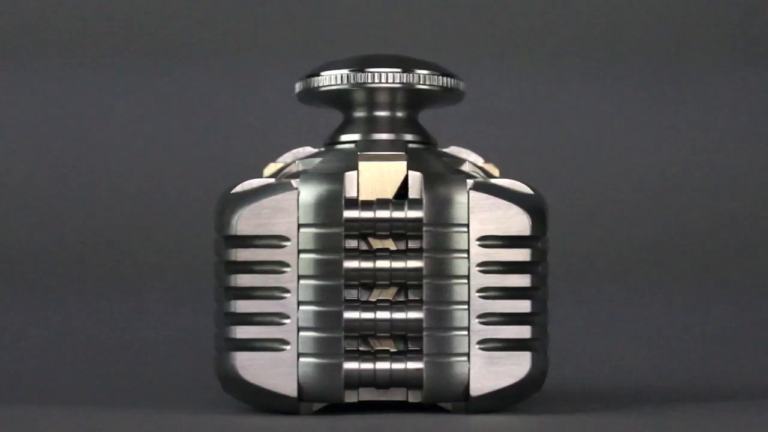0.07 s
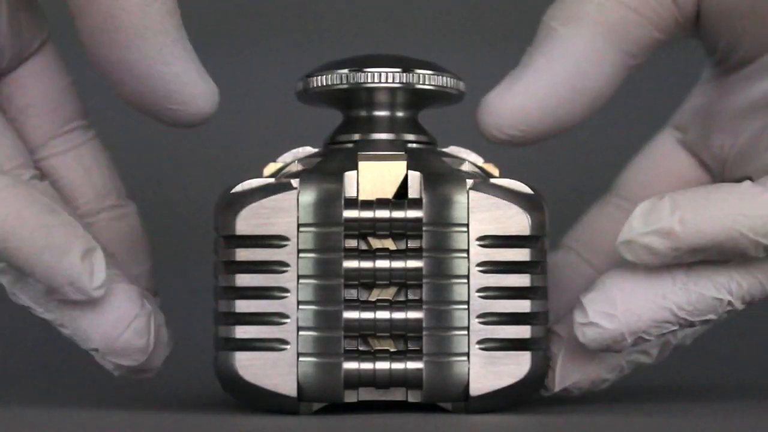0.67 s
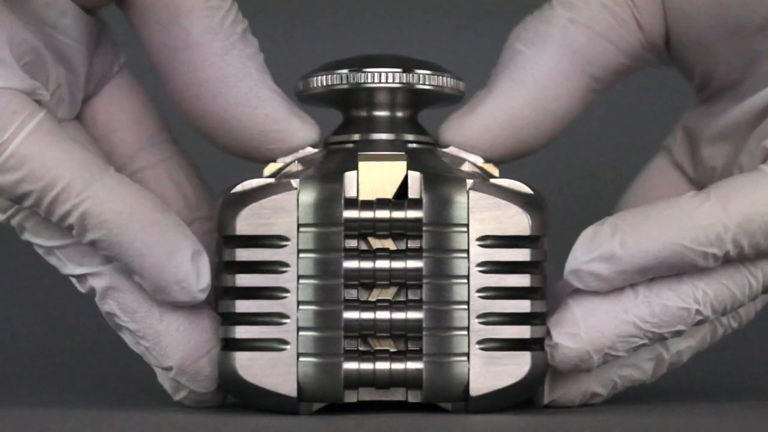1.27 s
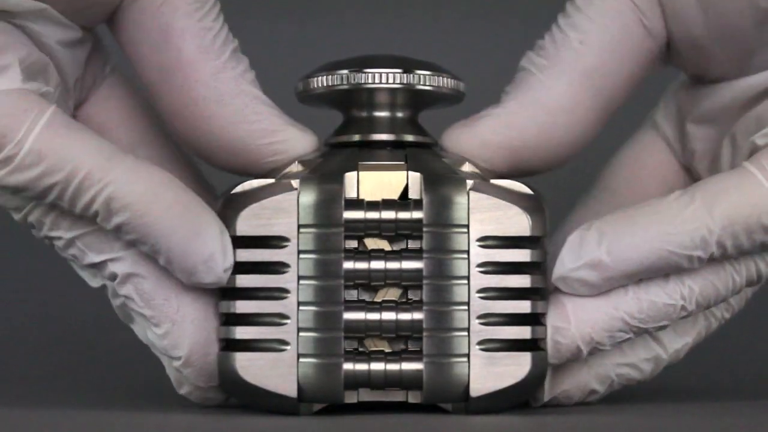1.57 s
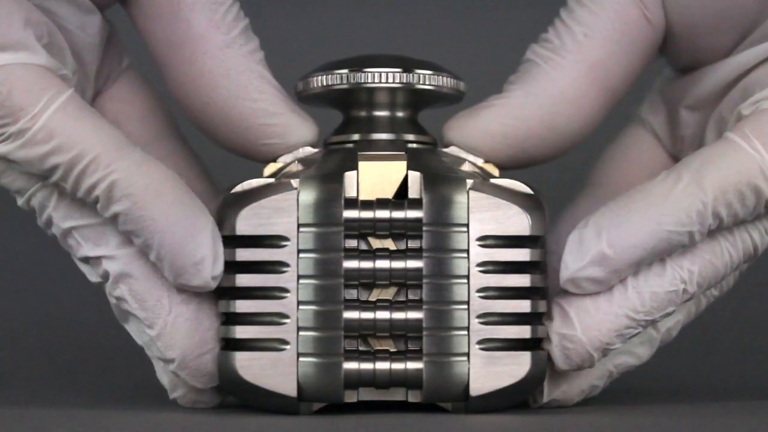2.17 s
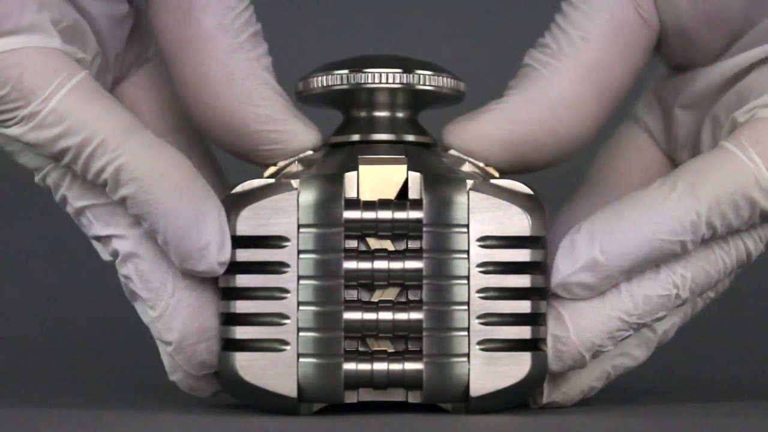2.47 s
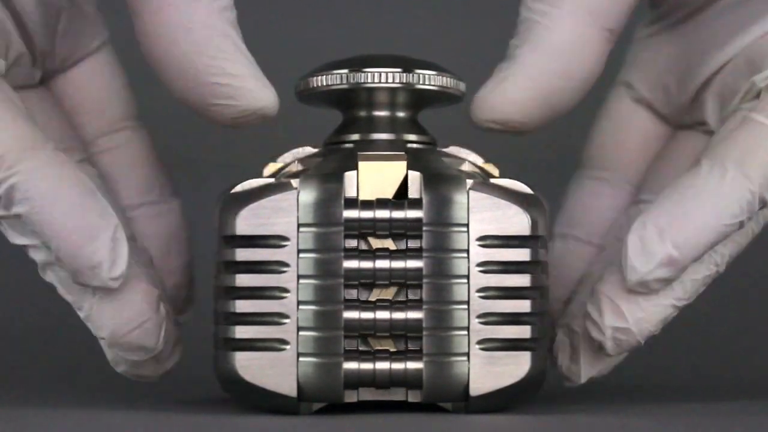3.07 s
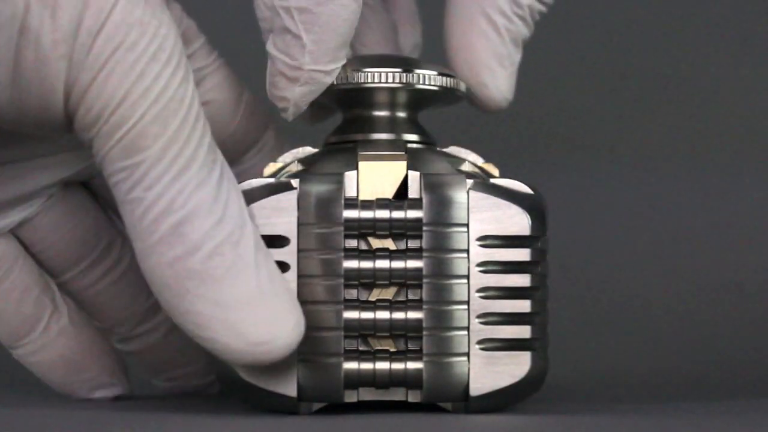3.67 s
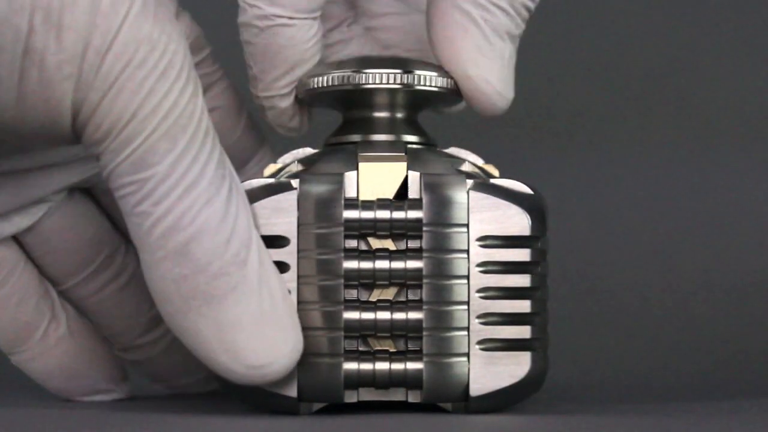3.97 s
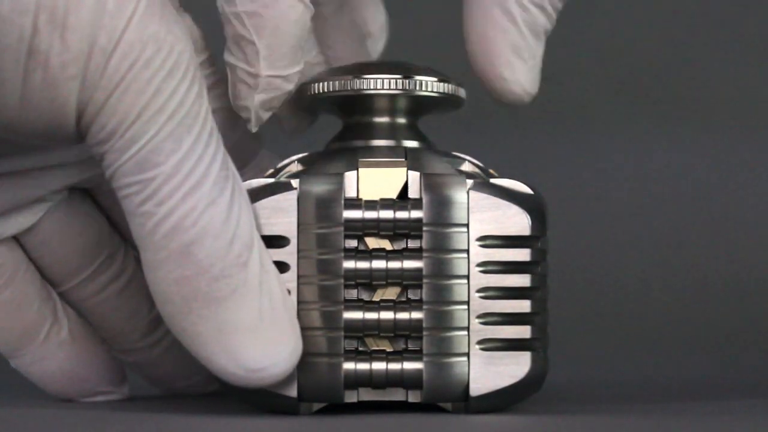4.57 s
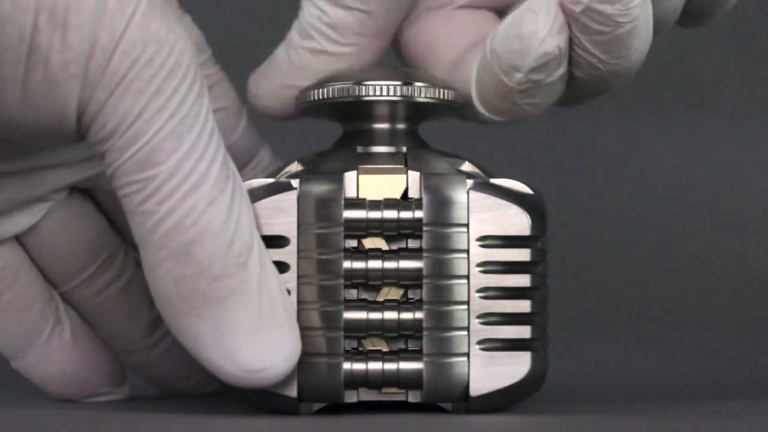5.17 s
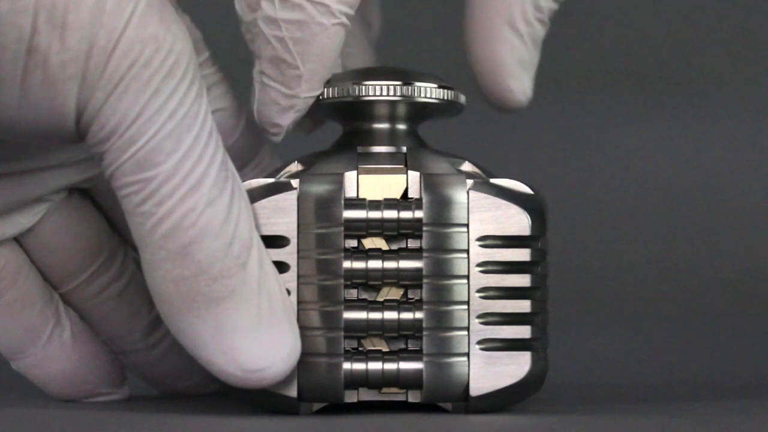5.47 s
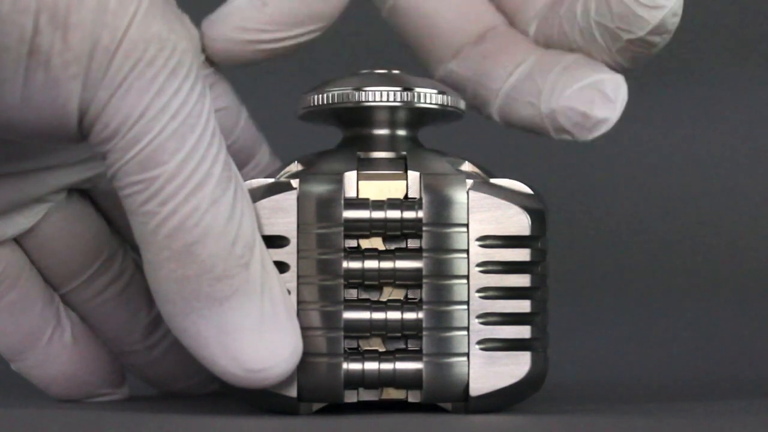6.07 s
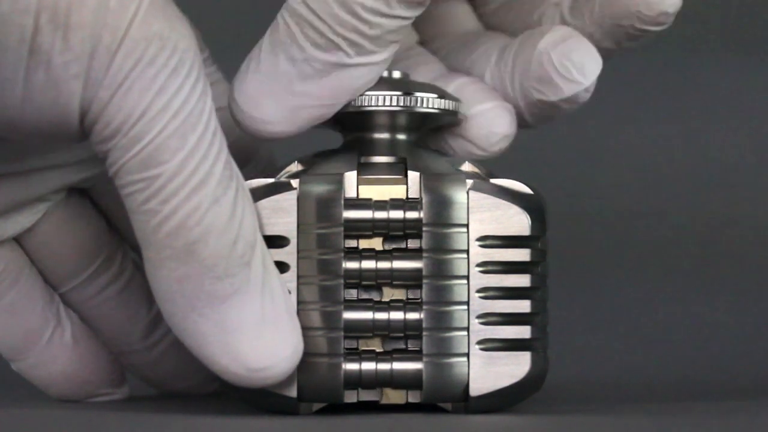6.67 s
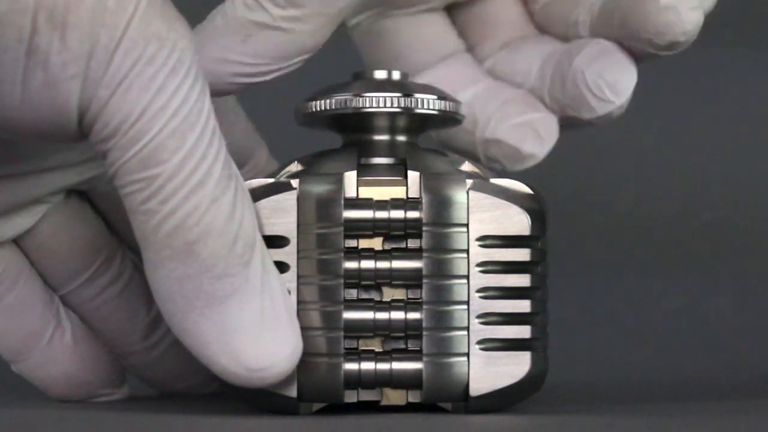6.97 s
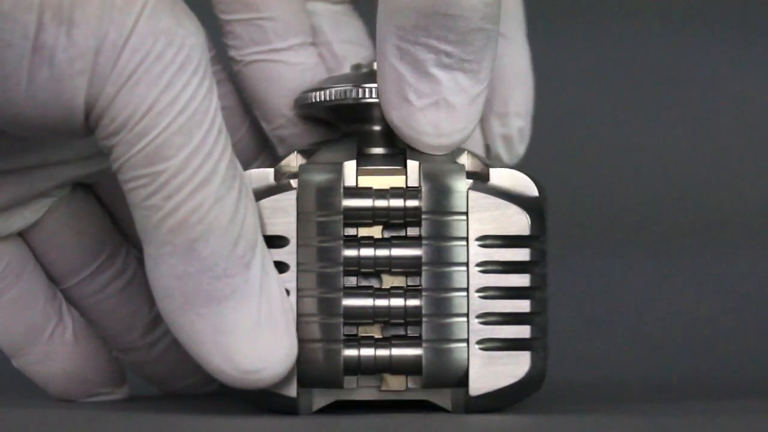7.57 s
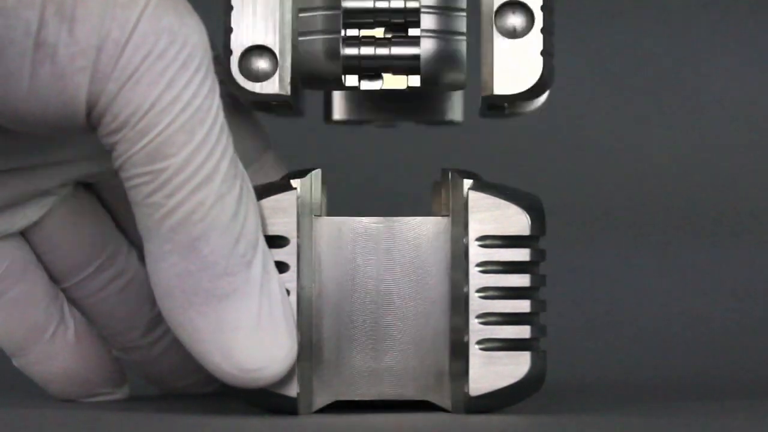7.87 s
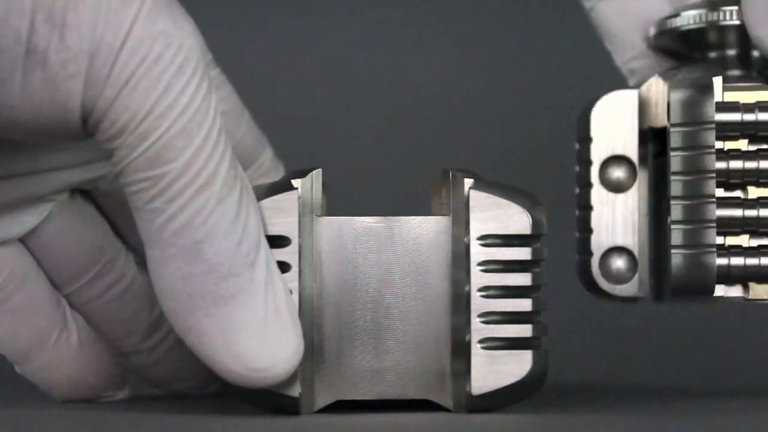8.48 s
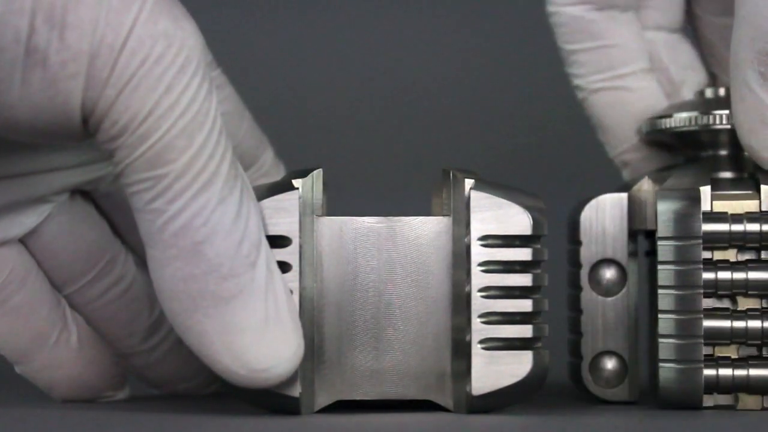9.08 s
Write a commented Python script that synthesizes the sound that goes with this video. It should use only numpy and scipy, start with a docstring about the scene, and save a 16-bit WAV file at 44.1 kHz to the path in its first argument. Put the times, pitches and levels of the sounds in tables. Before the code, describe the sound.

Rubber gloves brush a table and rub on a small steel lock. Loose parts knock and springs ping, then two buttons snap in sharply, a second apart. A knob grinds through four short turns, with glove crinkles and little rubber snaps. The core scrapes up out of its housing with a brief metallic ring and is set on the table with a clunk. The sound is close, in a quiet, slightly live room.

```python
"""Opening a steel puzzle lock

Gloved hands work a small lock on a table in a quiet, slightly live room. Rubber rubs, loose
parts knock and ping, and two sprung buttons slide and snap in. A knurled knob grinds through
four turns, then the core scrapes up between its steel cheeks and is set down with a clunk."""
import sys
import numpy as np
from scipy import signal
from scipy.fft import rfft, irfft
from scipy.io import wavfile

SR = 44100
rng = np.random.default_rng(int(sys.argv[2]) if len(sys.argv) > 2 else 0)


def waveform_to_disk(signal):
    """Save audio, clipped to [-1, 1], as 16-bit WAV at the path in sys.argv[1]."""
    frames = np.transpose(np.atleast_2d(signal))
    scaled = np.clip(frames, -1, 1) * 32767
    samples = np.round(scaled).astype(np.int16)
    wavfile.write(sys.argv[1], SR, samples)


N = 410571


def from_db(db):
    """Decibels to gain."""
    return 10 ** (np.asarray(db) / 20)


def in_time(points):
    """A curve of (time, value) points, read at every sample."""
    return np.interp(np.arange(N) / SR, *np.transpose(points))


def at_hz(points, hz):
    """A curve of (frequency, value) points, read on a log-frequency axis."""
    f, value = np.transpose(points)
    return np.interp(np.log(np.maximum(hz, 1)), np.log(f), value)


def through(x, response):
    """Pass a sound through an impulse response."""
    return signal.oaconvolve(x, response)[:len(x)]


def colour(spectrum, size=4096):
    """Minimum-phase response of unit energy with the given spectral shape."""
    hz = np.arange(size // 2 + 1) * SR / size
    cepstrum = irfft(np.log(from_db(at_hz(spectrum, hz))))
    cepstrum[1:size // 2] *= 2
    cepstrum[size // 2 + 1:] = 0
    response = irfft(np.exp(rfft(cepstrum)))
    return response / np.linalg.norm(response)


def body(modes):
    """Unit-energy response of damped resonances (f/Hz, width/Hz, level/dB)."""
    t = np.arange(SR // 2) / SR
    response = 0
    for k, (hz, width, db) in enumerate(modes):
        decay = from_db(db) * width * np.exp(-np.pi * width * t)
        response += (-1) ** k * decay * np.sin(2 * np.pi * hz * t)
    return response / np.linalg.norm(response)


def strike(hits, modes):
    """Clean blows (t/s, peak/dB) on a body."""
    force, response = np.zeros(N), body(modes)
    for s, db in hits:
        force[int(s * SR)] += from_db(db)
    return through(force, response / np.abs(response).max())


def chatter(hits, t60):
    """Each hard contact (t/s, level/dB) is a burst of tiny collisions that dies within milliseconds."""
    out, t = np.zeros(N), np.arange(SR // 10) / SR
    for s, db in hits:
        at = int(s * SR)
        burst = from_db(db - 60 * t / t60) * rng.standard_normal(len(t))
        out[at:at + len(t)] += burst[:N - at]
    return out


def friction(per_s, spread_db, judder_db, judder_per_s):
    """Asperities slip with uneven force, in clumps as the surfaces stick and let go; unit power."""
    slips = (rng.random(N) < per_s / SR) * rng.choice([-1, 1], N)
    sizes = from_db(spread_db * np.minimum(rng.exponential(1, N), 4))
    judder = np.interp(np.arange(N) * judder_per_s / SR, np.arange(N), rng.standard_normal(N))
    force = slips * sizes * from_db(judder_db * judder)
    return force / np.sqrt(np.mean(force ** 2) + 1e-20)


def swell(s, db, rise_s, fall_s, hold_s=0):
    """Envelope of a move that peaks at s and may hold; rise and fall are times per 20 dB."""
    t = np.arange(N) / SR
    away = np.maximum((s - t) / rise_s, (t - s - hold_s) / fall_s)
    return from_db(db - 20 * np.clip(away, 0, 6))


def swells(rows):
    """Envelope of several such moves."""
    return sum(swell(*row) for row in rows)


def gliding_resonance(x, hz, width_hz):
    """A resonance whose centre moves; white noise keeps its power."""
    carrier = np.exp(2j * np.pi * np.cumsum(hz) / SR)
    pole = np.exp(-np.pi * width_hz / SR)
    ringing = carrier * signal.lfilter([1], [1, -pole], x / carrier + 1e-18)
    return np.sqrt(2 * (1 - pole * pole)) * ringing.imag


# EQ of the room's rumble and of soft hiss: f/Hz, level/dB
RUMBLE_EQ = [(15, -50), (25, -12.5), (53, -10.5), (113, -0.5), (198, -10), (233, -2.5), (260, -9.5),
             (349, -6.5), (399, -13.5), (445, -6.5), (552, -16), (826, -16), (1170, -21.5), (8350, -34),
             (15500, -46)]
HISS_EQ = [(200, -23), (700, -1), (2500, -5.5), (6000, -11), (10000, -17.5), (16000, -35)]

def room_tone():
    """A steady bed of low rumble, a soft hum near its peak, and hiss."""
    noise = rng.standard_normal((3, N))
    rumble = from_db(-49.5) * through(noise[0], colour(RUMBLE_EQ))
    hum = from_db(-58.5) * through(noise[1], body([(116.8, 3.6, 0)]))
    hiss = from_db(-60.5) * through(noise[2], colour(HISS_EQ))
    return rumble + hum + hiss


# hand moves: t/s, level/dB, rise/s, fall/s
HAND_SWISHES = [(.18, -56, 0.14, 0.082), (.32, -51.5, 0.47, 0.97), (3.35, -54, 1, 2.6)]  # reaching in and changing grip
TABLE_BRUSHES = [(.31, -53, 0.13, 0.35), (.605, -50, 0.14, 0.052)]  # sweeping over the table
STEEL_RUBS = [(.882, -46.5, 0.095, 0.029), (1.2, -61, .1, .1), (1.56, -54, 0.15, 0.35),
              (2.58, -53, .1, .15), (3.25, -58.5, 0.22, .45), (4.1, -56, .05, 0.062),
              (4.254, -39.5, .025, 0.034), (4.53, -53, 0.12, 0.15), (4.624, -50.5, .03, 0.11),
              (5.072, -49, 0.018, 0.046), (5.455, -51, 0.2, 0.081), (6.25, -54, 0.32, 0.19),
              (6.714, -51, 0.01, 0.041), (6.843, -46.5, 0.024, .03), (7.082, -46, 0.069, 0.031),
              (7.186, -59, 0.22, .25)]  # taking hold of the steel or letting go
# rubber snapping off metal: t/s, level/dB
GLOVE_SNAPS = [(0.9448, -40), (3.6122, -31), (4.1774, -30), (4.5227, -34), (5.2734, -35), (6.2492, -29.5),
               (6.3684, -32.5), (6.7354, -23), (7.191, -34)]
# EQ of the dull table brush and of bright rubber on steel: f/Hz, level/dB
BRUSH_EQ = [(100, -5), (450, -1.5), (1000, -4.5), (1500, -15), (3000, -14), (12000, -34)]
RUBBER_EQ = [(300, -27), (1500, 1.5), (4000, -0.5), (7500, 2.5), (11000, -2.5), (13500, -9.5), (16000, -28)]

def gloves():
    """Thin rubber brushes the table, hisses and crinkles over the knurling and at times snaps free."""
    slips = friction(6000, spread_db=4, judder_db=2.5, judder_per_s=170)
    crinkles = from_db(-10) * friction(70, spread_db=7.5, judder_db=6.5, judder_per_s=20)
    # the fingers rub loudest where each turn of the knob is fastest
    turning = sum(swell(fastest_s, db, rise_s=0.2, fall_s=0.15) for _, _, fastest_s, *_, db in TURNS)
    rubbing = (swells(STEEL_RUBS) + turning) * (slips + crinkles)
    snapping = from_db(-8) * chatter(GLOVE_SNAPS, t60=0.0063)
    swishing = swells(HAND_SWISHES) * through(rng.standard_normal(N), colour(HISS_EQ))
    brushing = through(swells(TABLE_BRUSHES) * slips, colour(BRUSH_EQ))
    return through(rubbing + snapping, colour(RUBBER_EQ)) + brushing + from_db(-1.5) * swishing


# dull knocks inside the housing: t/s, level/dB, f/Hz
KNOCKS = [(0.319, -41.5, 930), (1.038, -43, 750), (1.334, -44, 200), (1.635, -37.5, 1063),
          (2.600, -27.5, 982), (4.078, -40, 990), (4.202, -28.5, 850), (5.016, -29, 870), (5.101, -33, 580),
          (5.768, -38.5, 1045), (5.848, -30, 940), (5.990, -28, 555), (6.883, -26.5, 579),
          (7.700, -17.5, 1274), (7.934, -26, 321)]
# pings of the button springs: t/s, level/dB
SPRING_PINGS = [(1.660, -43), (1.692, -42), (1.760, -35.5), (1.844, -46), (2.620, -47), (2.643, -55),
                (2.6735, -37)]
# single steel parts ringing briefly: t/s, level/dB, f/Hz, width/Hz
STEEL_TINGS = [(1.760, -40, 2290, 18), (2.5762, -38, 5200, 500), (2.643, -43, 7900, 150),
               (2.969, -45, 4370, 25), (3.2418, -26, 5560, 1200), (5.783, -32, 4800, 270),
               (5.829, -37, 3120, 120), (5.853, -33, 4960, 59), (6.712, -26.5, 4950, 60.7),
               (7.701, -24, 2380, 110), (7.933, -27, 1940, 130)]
# ring of the housing and of the springs: f/Hz, width/Hz, level/dB
HOUSING_MODES = [(305, 48, -8), (460, 98, -3.5), (569, 67, -5.5), (656, 67, -2.5), (838, 91, -2),
                 (1031, 114, 0.5), (1129, 44, 2), (1400, 110, -12), (1910, 180, -8)]
SPRING_MODES = [(2216, 26, -4), (2680, 44, -9), (3275, 66, -5), (3530, 7, 2), (4380, 28, -2.5),
                (5478, 15, -9), (7050, 20, -9.5), (7460, 36, -17)]
# EQ of a hard steel crack: f/Hz, level/dB
CRACK_EQ = [(150, -27), (600, -1), (2100, 3), (3600, -3), (6500, -1.5), (9000, -13), (10500, -27),
            (13700, -27), (16000, -8)]

def loose_parts(knock_width_hz=40):
    """Parts knock, and springs tick and ping, as the load on them changes."""
    knocks = from_db(1) * sum(strike([(s, db)], [(hz, knock_width_hz, 0)]) for s, db, hz in KNOCKS)
    housing = from_db(0.5) * strike([(s, db) for s, db, _ in KNOCKS], HOUSING_MODES)
    pings = from_db(5) * strike(SPRING_PINGS, SPRING_MODES)
    ticks = from_db(-4) * through(chatter(SPRING_PINGS, t60=0.035), colour(CRACK_EQ))
    tings = sum(strike([(s, db)], [(hz, width, 0)]) for s, db, hz, width in STEEL_TINGS)
    return knocks + housing + pings + ticks + tings


# buttons taking up their slack: t/s, length/s, level/dB
TAKE_UPS = [(1.542, 0.084, -45), (2.56, 0.055, -44)]
# a button trips its catch, then snaps home:
# trip t/s, crack level/dB, ring f/Hz, ring level/dB, home t/s, level/dB, housing level/dB, clack f/Hz
PRESSES = [(2.0051, -27.5, 6850, -20.5, 2.0614, -19.5, -21, 1090),
           (2.9662, -33, 3950, -29.5, 3.0374, -16.5, -16, 2080)]
# EQ of a button sliding in its guide: f/Hz, level/dB
SLIDE_EQ = [(100, 2), (450, -4.5), (1050, 1), (2000, -7.5), (3500, -8), (6000, -14), (9000, -22),
            (11000, -36), (16000, -63)]

def button_slides(glide_db=-49, rush_db=-11):
    """The buttons rub in their guides: they take up slack, glide once the catch trips, and rush home."""
    t = np.arange(N) / SR
    travel = sum(swell(s, db, rise_s=0.062, fall_s=0.15, hold_s=length) for s, length, db in TAKE_UPS)
    for trip_s, *_, home_s, _, knock_db, _ in PRESSES:
        travel += from_db(glide_db) * (t > trip_s) * (t < home_s)
        travel += swell(home_s, knock_db + rush_db, rise_s=0.025, fall_s=0.02)
    slips = friction(5000, spread_db=4, judder_db=2, judder_per_s=160)
    return travel * through(slips, colour(SLIDE_EQ))


# the four contacts in each snap home, with times and levels relative to it:
# t/s, crack level/dB, ring f/Hz, ring level/dB, housing level/dB
SNAP_CONTACTS = [(-.0028, -12, 8800, -11, -20), (0, -4.5, 8750, -3.5, -9.5), (.0045, -.5, 7670, 0, -6),
                 (.0084, -5.5, 6500, -9, -4)]

def button_snaps(ring_width_hz=700, creep_s=0.0026, creep_db=-31, trip_knock_db=-32, clack_db=-1):
    """Each trip and snap home is a crack, a short ring of the catch and a knock in the housing."""
    cracks, rings, knocks = [], [], []
    for trip_s, trip_db, trip_hz, trip_ring_db, home_s, home_db, knock_db, clack_hz in PRESSES:
        cracks.append((trip_s - creep_s, creep_db))  # the catch ticks just before it trips
        cracks.append((trip_s, trip_db))
        rings.append((trip_s, trip_ring_db, trip_hz))
        knocks.append((trip_s, trip_knock_db))
        last_contact_s = home_s + SNAP_CONTACTS[-1][0]
        rings.append((last_contact_s, home_db + clack_db, clack_hz))  # the button's own note
        for delay, crack_db, hz, ring_db, housing_db in SNAP_CONTACTS:
            cracks.append((home_s + delay, home_db + crack_db))
            rings.append((home_s + delay, home_db + ring_db, hz))
            knocks.append((home_s + delay, knock_db + housing_db))
    cracking = through(chatter(cracks, t60=0.018), colour(CRACK_EQ))
    ringing = sum(through(chatter([(s, db)], t60=0.015), body([(hz, ring_width_hz, 0)]))
                  for s, db, hz in rings)
    return cracking + ringing + strike(knocks, HOUSING_MODES)


# turns of the knob: grip t/s, steady level/dB, fastest t/s, surge level/dB, rise/s, fall/s,
# stop t/s, grit level/dB relative to the thread, glove level/dB
TURNS = [(4.082, -45, 4.25, -33, 0.15, 0.077, 4.375, -18, -49),
         (4.94, -49, 5.03, -30.5, 0.062, 0.18, 5.1, -12, -47),
         (5.778, -47, 5.856, -38, 0.033, 0.3, 5.96, -8, -47),
         (6.675, -51.5, 6.745, -40, 0.2, 0.3, 6.86, -11, -47)]
# EQ of the rubbing thread: f/Hz, level/dB
THREAD_EQ = [(60, 0), (115, -2.5), (230, -3.5), (380, -9.5), (550, 1), (950, -2), (1400, -5.5), (2500, -12),
             (5000, -16), (8000, -28), (16000, -38)]
# ring of the knurled knob: f/Hz, width/Hz, level/dB
KNOB_MODES = [(2250, 220, 0), (3110, 150, 0), (3730, 91, 3), (4210, 54, 4.5), (5420, 57, -0.5),
              (6130, 170, -7)]

def knob(note_hz=968, stop_hz=540, sing_hz=5200, attack_s=0.047, release_s=0.076):
    """The thread grinds and excites a note that sinks as each turn slows; hard slips add grit."""
    efforts, pitch, looseness = [], [], 0
    for grip_s, steady_db, fastest_s, surge_db, rise_s, fall_s, stop_s, grit_db, _ in TURNS:
        moving = swell(grip_s, 0, attack_s, release_s, hold_s=stop_s - grip_s)
        wrist_twist = swell(fastest_s, surge_db, rise_s, fall_s)
        effort = moving * (from_db(steady_db) + wrist_twist)
        efforts.append(effort)
        looseness += effort * from_db(grit_db)
        pitch += [(grip_s - attack_s, note_hz), (fastest_s, note_hz), (stop_s + release_s, stop_hz)]
    grinding = friction(2600, spread_db=2.5, judder_db=2.5, judder_per_s=110)
    slips = sum(efforts) * grinding
    hard_slips = looseness * friction(900, spread_db=5, judder_db=7, judder_per_s=90)
    thread = from_db(-5) * through(slips, colour(THREAD_EQ))
    note = from_db(-5.5) * gliding_resonance(slips, in_time(pitch), width_hz=160)
    grit = through(hard_slips, body(KNOB_MODES))
    # the thread sings in the last turn
    singing = from_db(-14) * through(efforts[-1] * grinding, body([(sing_hz, 60, 0)]))
    return thread + note + grit + singing


# envelope of the pull on the core: t/s, level/dB
PULL_ENVELOPE = [(7.638, -54), (7.652, -27), (7.668, -32), (7.68, -17), (7.71, -19.5), (7.745, -27.5),
                 (7.81, -41.5), (7.87, -26.5), (7.938, -25), (7.955, -60)]
# the core's edges catching on the housing: t/s, level/dB
EDGE_CLINKS = [(7.673, -36), (7.6822, -27), (7.6865, -25), (7.846, -48), (7.911, -54), (7.932, -42)]
# ring of the cheeks, braced and free, and of the edges: f/Hz, width/Hz, level/dB
BRACED_MODES = [(471, 8.6, 1.5), (606, 25.8, -5.5), (703, 21, 4.5), (715, 21, 2), (997, 27, -3.5),
                (1047, 35, -2), (1154, 21, -6), (1340, 8.4, 1), (1368, 26, -2), (2375, 25, -3),
                (2525, 47, -8), (5820, 120, -30), (12230, 60, -50)]
FREE_MODES = [(317, 38, -1), (466, 19, -6), (689, 44, 6), (752, 88, 3), (1060, 42, -14), (1764, 92, -4),
              (1876, 45, -1.5), (5930, 120, -34), (12000, 55, -35), (12900, 70, -35)]
EDGE_MODES = [(4020, 380, -3.5), (5080, 97, 2), (5730, 54, 9), (6010, 130, 3), (7790, 110, 0.5),
              (12200, 28, -10), (12500, 46, -15)]
# EQ of the steel-on-steel scrape: f/Hz, level/dB
SCRAPE_EQ = [(60, -57), (140, -2.5), (400, -2), (700, 9.5), (1300, -0.5), (2400, -11), (3200, -19.5),
             (6000, -26), (9000, -31.5), (16000, -57)]

def core_pull(clear_s=7.77, clearing_s=0.088):
    """The core scrapes up between two steel cheeks, which ring lower once it no longer braces them."""
    t = np.arange(N) / SR
    pulling = (t > PULL_ENVELOPE[0][0]) * (t < PULL_ENVELOPE[-1][0])
    effort = from_db(in_time(PULL_ENVELOPE)) * pulling
    slips = effort * friction(4000, spread_db=0.5, judder_db=2, judder_per_s=140)
    freed = np.clip(0.5 + (t - clear_s) / clearing_s, 0.05, 0.95)
    braced = through(slips * np.sqrt(1 - freed), body(BRACED_MODES))
    free = through(slips * np.sqrt(freed), body(FREE_MODES))
    scrape = from_db(-3.5) * through(slips, colour(SCRAPE_EQ))
    clinks = from_db(8) * strike(EDGE_CLINKS, EDGE_MODES)
    return from_db(-2) * (braced + free) + scrape + clinks


# the core hitting the table: t/s, boom level/dB, rattle level/dB
LANDINGS = [(9.1277, -36.5, -36), (9.1527, -17.5, -18.5), (9.1545, -5, -28), (9.1607, -22, -29),
            (9.1867, -36, -29)]
# boom of the table: f/Hz, width/Hz, level/dB
TABLE_MODES = [(122, 23, 4), (180, 46, 4), (249, 76, 4.5), (352, 39, 1.5), (430, 62, 2.5), (576, 41, 5.5),
               (634, 68, 5.5), (753, 210, -3)]
# EQ of the core's rattle: f/Hz, level/dB
RATTLE_EQ = [(100, -1), (600, 0), (1300, 3.5), (2300, -7), (3000, -3.5), (3800, -11.5), (5600, -15),
             (7000, -25), (10000, -34.5), (16000, -50)]

def core_landing():
    """The core lands on one edge, drops flat and rocks once; the table booms and loose discs rattle."""
    boom = strike([(s, db) for s, db, _ in LANDINGS], TABLE_MODES)
    rattle = chatter([(s, db) for s, _, db in LANDINGS], t60=0.046)
    return from_db(0.5) * boom + through(rattle, colour(RATTLE_EQ))


# reverb against the dry sound: f/Hz, level/dB
REVERB_EQ = [(100, 4), (400, 3), (1000, -1.5), (3000, -5), (8000, -12.5), (15000, -13)]
# reverb decay: f/Hz, t60/s
REVERB_T60 = [(100, 0.39), (500, 0.35), (1500, 0.41), (5000, 0.46), (15000, 0.32)]

def room(x, build_up_s=0.0038):
    """Direct sound plus a diffuse tail, in third-octave bands that each die at their own pace."""
    t, tail = np.arange(SR * 3 // 4) / SR, 0
    onset = 1 - np.exp(-(t / build_up_s) ** 2)
    edges = np.geomspace(63, 16000, 25)
    for low, high in zip(edges, edges[1:]):
        band = signal.butter(3, [low, high], "band", fs=SR, output="sos")
        centre = np.sqrt(low * high)
        decay = from_db(-60 * t / at_hz(REVERB_T60, centre))
        echoes = signal.sosfilt(band, rng.standard_normal(2 * len(t)))[len(t):] * onset * decay
        gain = np.sqrt(2 * (high - low) / SR) * from_db(at_hz(REVERB_EQ, centre))
        tail += gain * echoes / np.linalg.norm(echoes)
    return x + through(x, tail)


def scene(low_cut_hz=85):
    """All handling sounds share the room, in mono; their lowest bass is cut away."""
    buttons = button_slides() + button_snaps()
    handling = buttons + loose_parts() + knob() + core_pull() + core_landing() + gloves()
    low_cut = signal.butter(3, low_cut_hz, "high", fs=SR, output="sos")
    return (room(signal.sosfilt(low_cut, handling)) + room_tone())[None]


def record(dry, start_s=0.085, fade_s=0.045, high_cut_hz=15600):
    """A quick fade-in after a moment of silence, and a steep high cut."""
    fade = np.clip((np.arange(N) / SR - start_s) / fade_s, 0, 1)
    high_cut = signal.ellip(12, 0.1, 80, high_cut_hz, fs=SR, output="sos")
    return signal.sosfilt(high_cut, dry * fade)


dry = scene()
out = record(dry)
waveform_to_disk(out)
```